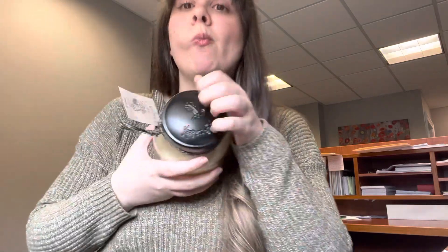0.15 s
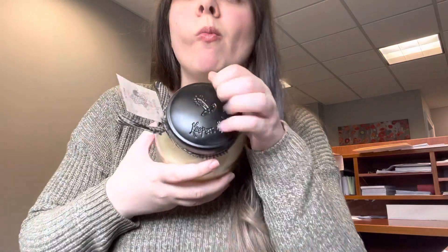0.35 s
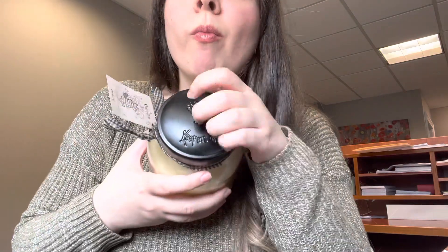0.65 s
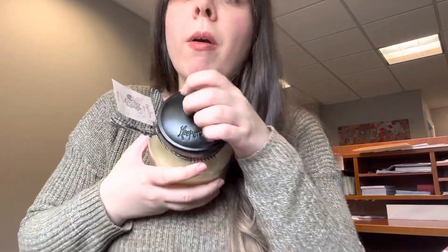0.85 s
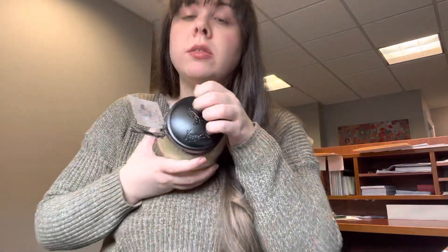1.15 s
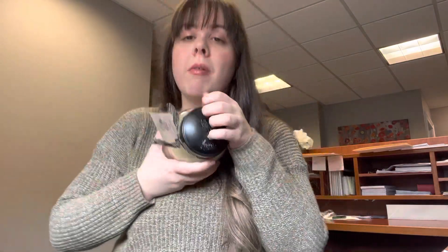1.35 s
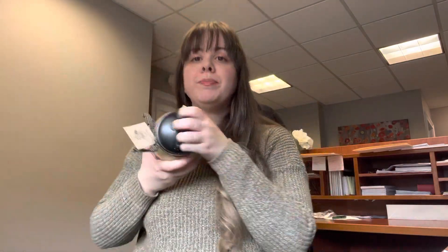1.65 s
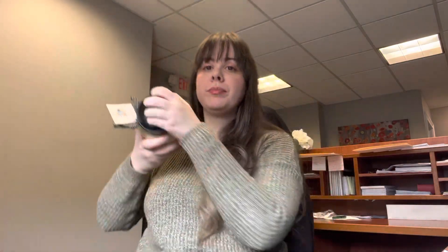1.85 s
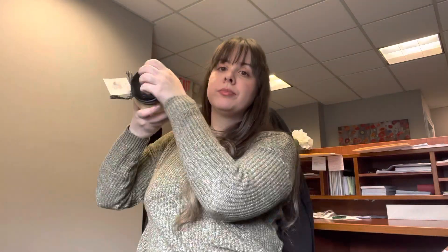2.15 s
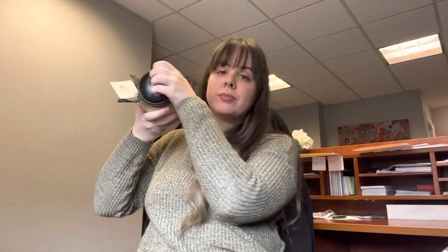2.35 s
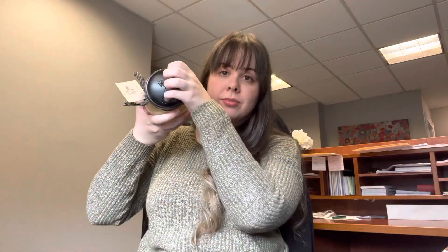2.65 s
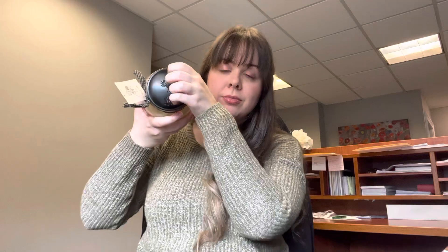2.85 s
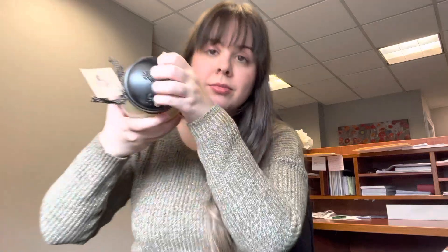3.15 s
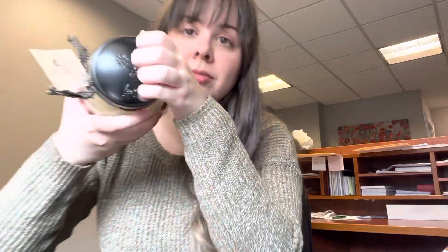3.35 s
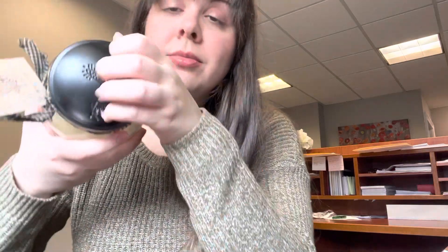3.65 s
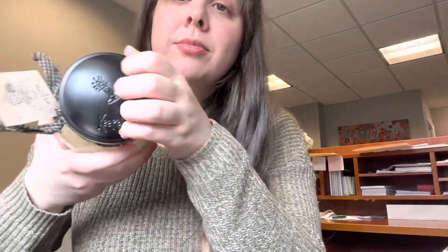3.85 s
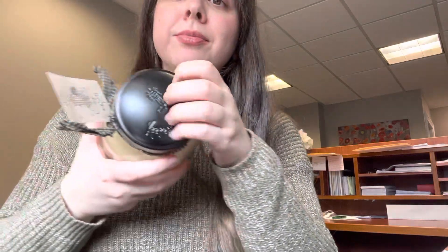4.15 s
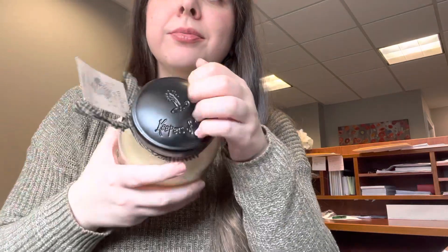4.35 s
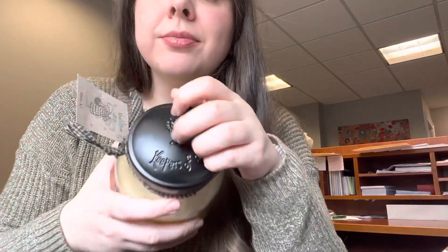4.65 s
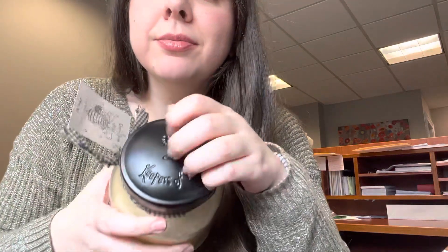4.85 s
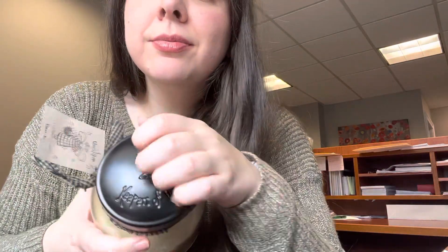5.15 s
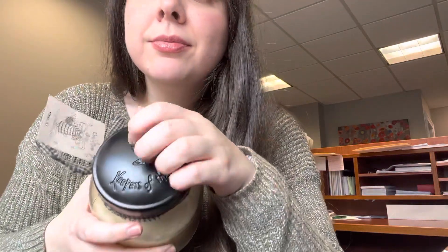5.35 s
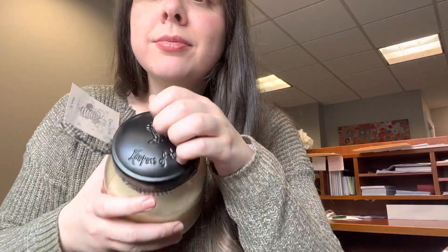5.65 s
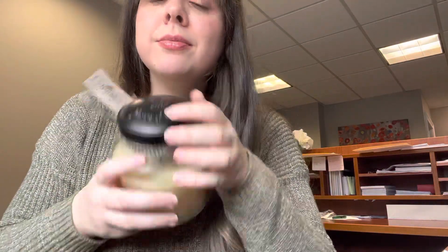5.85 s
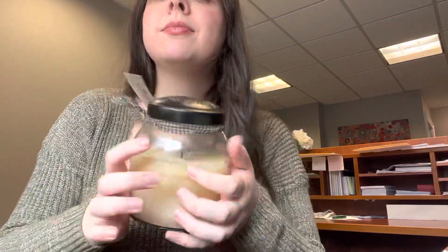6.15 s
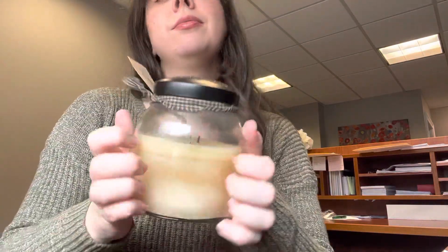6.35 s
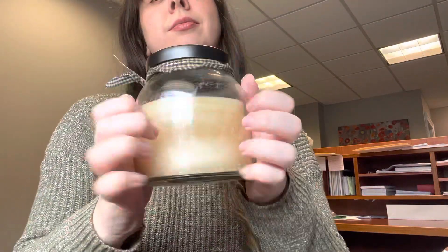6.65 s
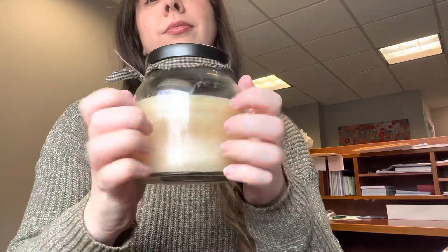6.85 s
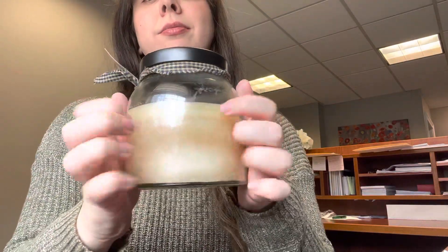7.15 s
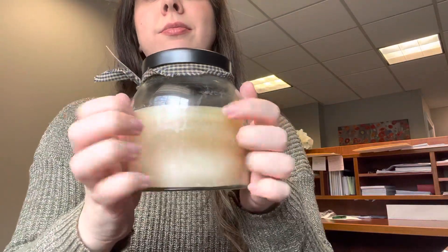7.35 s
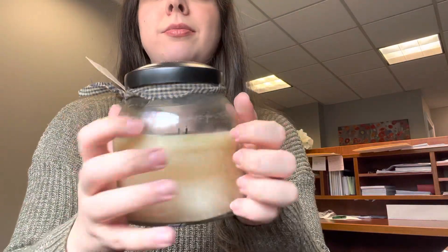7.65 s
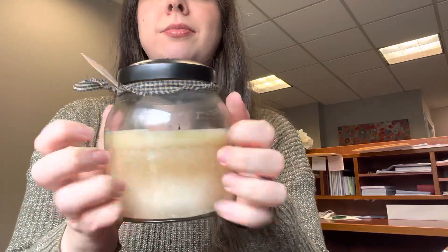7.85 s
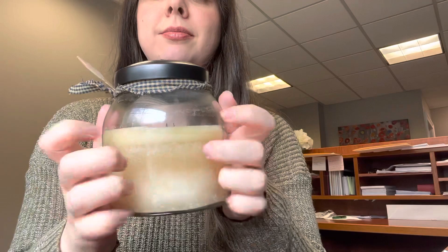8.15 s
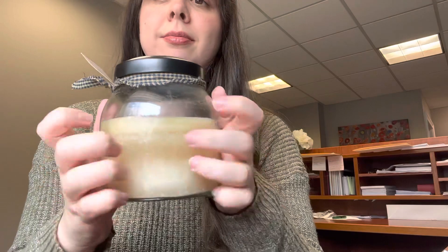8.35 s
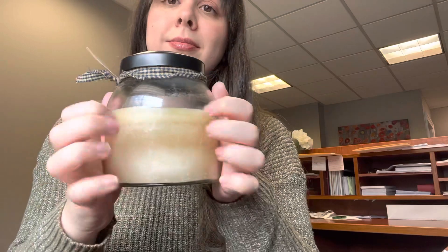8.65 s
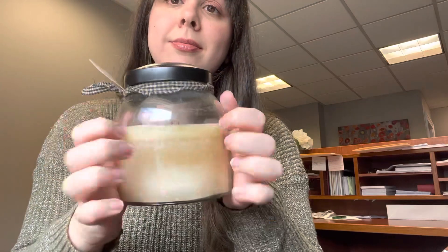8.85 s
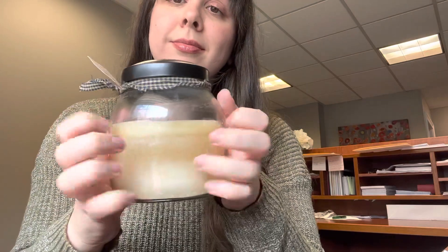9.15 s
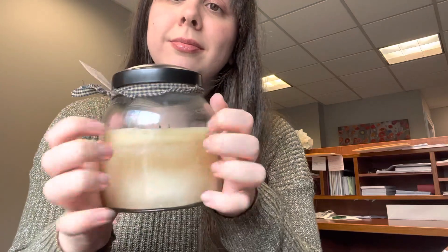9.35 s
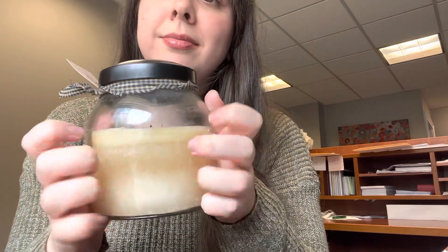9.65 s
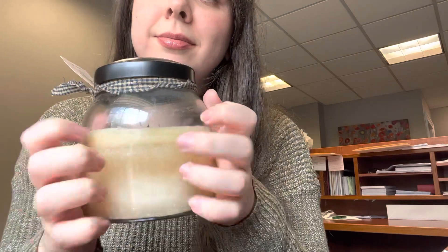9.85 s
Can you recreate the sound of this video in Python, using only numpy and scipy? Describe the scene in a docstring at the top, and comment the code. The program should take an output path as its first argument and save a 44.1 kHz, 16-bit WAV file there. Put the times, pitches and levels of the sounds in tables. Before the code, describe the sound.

Close, rapid nail tapping on a ringing metal lid with hollow knocks gives way to softer, drier clicking on a wax-filled glass jar.

```python
"""Fingernails drum on the metal lid of a wax-filled glass jar, then on its glass wall, close to two ports in an office.
Ventilation, a wandering hum and faint brushing of hands (filtered noise, a sine) lie under everything.
From the start the lid rings bright and short: noise cracks, sheet-metal modes and a hollow knock; bumps
and a squeak (gliding and wavering sines) join in. At six seconds the jar changes hands and the loose lid
rattles on the rim; then the glass gives dry ticks, noise bursts with modes damped by wax and palms."""
import sys
import numpy as np
from scipy import signal
from scipy.fft import rfft, irfft, next_fast_len
from scipy.io import wavfile
from scipy.ndimage import uniform_filter1d

SR = 44100
rng = np.random.default_rng(int(sys.argv[2]) if len(sys.argv) > 2 else 0)


def transcribe(signal):
    """Save signal, clipped to [-1, 1], as a 16-bit WAV file at the path in sys.argv[1]."""
    frames = np.atleast_2d(signal).T
    limited = np.clip(frames, -1, 1)
    pcm = np.round(limited * 32767).astype(np.int16)
    wavfile.write(sys.argv[1], SR, pcm)


N = 440118

# Ventilation colour, with a broad drone near 70 Hz. Each row: frequency in Hz, relative level in dB.
AIR_COLOUR = [(25, -22), (42, -35.5), (52, -8), (60, -7.5), (70, 2.5), (84, -6), (100, -15), (147, -6),
              (180, -13.5), (290, -8), (340, -16), (470, -18.5), (560, -27.5), (1500, -37), (3000, -54.5),
              (12500, -69.5), (13800, -93)]
# Likeness of the ventilation at the two ports. Each row: frequency in Hz, left-right correlation from 0 to 1.
AIR_LIKENESS = [(40, 0.88), (100, 1), (200, 0.58), (1000, 0.041), (10000, 0.11)]
# Swells of the ventilation. Each row: time in seconds, rumble level in dB, rush level in dB.
AIR_SWELLS = [(0.0, -36, -41), (0.19, -53.5, -49), (1.47, -38, -42.5), (2.25, -53, -48.5),
              (3.19, -51, -47.5), (3.36, -39, -38), (3.45, -45.5, -43.5), (5.09, -51, -47),
              (6.2, -41, -45.5), (7.42, -51, -45.5), (7.59, -46.5, -46.5), (9.98, -49, -46.5)]
HUM_HZ, HUM_DB, HUM_WANDER = 60.05, -48, 0.031  # mean pitch, RMS level, RMS wander as a share of the pitch

# Skin and sleeves brushing the jar. Each row: time in seconds, level in dB.
BRUSH_LEVELS = [(0.0, -69), (1.45, -58), (2.47, -67), (3.11, -56), (5.6, -98), (5.95, -64), (8.8, -78),
                (9.98, -63)]
# Colour of the brushing. Each row: frequency in Hz, relative level in dB.
BRUSH_COLOUR = [(300, -48), (800, 10.5), (2500, 1), (4000, -4), (11000, -9.5), (12500, -3), (13800, -78)]

# Nails on the lid. Each row: start in seconds, tap level in dB, then hollow knock and nail click in dB
# relative to the tap.
LID_TAPS = [(0.0014, -25, -2.5, -0.5), (0.0468, -28.5, -16, -5), (0.0928, -17.5, -8.5, -13),
            (0.1045, -31, 5.5, 4), (0.195, -32, 4.5, -6), (0.2383, -29.5, -20, -22),
            (0.2613, -23.5, -3.5, -8.5), (0.3298, -17.5, -8, -6.5), (0.4334, -29.5, -2, 1.5),
            (0.4424, -18, -20, -7), (0.4813, -25.0, -24, -14.5), (0.5025, -29.5, -2.5, -29.5),
            (0.5173, -13, -16, -15), (0.593, -17, -1, 2), (0.623, -33.5, 5, -2), (0.6489, -27, -22, -23),
            (0.663, -20.5, -11.5, -7.5), (0.6903, -41, 7, 9), (0.7038, -20, 5.5, -9),
            (0.7183, -18, -6, -7.5), (0.8369, -25, -0.5, -8), (0.9103, -13.5, -6, -7.5),
            (0.9959, -17.5, -1.5, 0.5), (1.0575, -25.5, -11, -18), (1.1073, -22, 3, -2.5),
            (1.2795, -32, -17, -18), (1.3259, -25.5, -1, -2.5), (1.3543, -33, 5, 0), (1.553, -40, 8.5, 2),
            (1.6327, -31, -8, -20), (1.6413, -24, -8, -7), (1.6898, -27, -5, -14), (1.7183, -27.5, -18, -2),
            (1.738, -15.5, -6, -11), (1.858, -36.5, 5, -10), (1.8664, -27, -33, -11),
            (1.8866, -24, -13, -4.5), (1.91, -28.5, -3, -1), (1.935, -23, -8, -1.5), (2.035, -36.5, -2, 5),
            (2.0837, -29, -7, 2), (2.1039, -25.5, -1.5, -1.5), (2.2979, -37, 2, -3), (2.3067, -32, -4, 7.5),
            (2.3531, -23, -14, -3), (2.4941, -32, 3.5, 6), (2.5215, -20.5, -9.5, 1),
            (2.5666, -23.5, -6, -1), (2.6067, -30.5, -3, -4), (2.6955, -35, 5, 10),
            (2.7397, -31.5, -11, -11), (2.7767, -31.5, -2, -18), (2.8398, -22.5, -8, -0.5),
            (2.9533, -24, -8, -14), (3.0463, -28, -2.5, -6), (3.0673, -17.5, -7, -11), (3.1574, -26, -8, 7),
            (3.2127, -31.5, -31, -19), (3.225, -28.5, -9, -3), (3.249, -36.5, -3, 6),
            (3.2788, -18.5, -1, -6), (3.2915, -21.5, -3.5, -5.5), (3.4184, -33, 1.5, 11),
            (3.4514, -23, -6, -10.5), (3.489, -23.0, -23, -6.5), (3.503, -30.5, 1, -11),
            (3.512, -14, -8.5, -9), (3.6426, -44, 13, 15.5), (3.6542, -35, 9, 10), (3.68, -20.5, -11, -15),
            (3.7232, -25, -15.5, -11), (3.739, -35, -10, -8), (3.7528, -25, -0.5, -9), (3.764, -26, -6, -1),
            (3.7738, -15.5, -4.5, -10.5), (3.8893, -48.5, 6, 14.5), (3.9133, -17.0, -11, -7.5),
            (3.9478, -27.5, 0, -13), (3.961, -43, -1, -8), (3.9919, -21.5, -2, -1), (4.0077, -23, -4, -19),
            (4.095, -50, 0, 14), (4.1132, -27, 10, 11), (4.12, -24, -27, -7), (4.1854, -22, -16, -7.5),
            (4.2056, -15.5, -24, -11.5), (4.2213, -33.5, -4.5, 0.5), (4.3825, -33.5, 0, -12),
            (4.5352, -29.5, 4, -11), (4.5918, -16, -12.5, -6), (4.6182, -31, 2, -7),
            (4.6353, -19, -13, -9.5), (4.679, -52, 4, -8.5), (4.6945, -21, -3, -25),
            (4.7037, -25, 2.5, 1.5), (4.808, -35, 1, 0), (4.839, -18, -5.5, -8), (4.8713, -29.5, 4, -17),
            (4.9075, -19.5, -4.5, -16.5), (5.0102, -34, 1.5, -26), (5.1143, -19.5, -9, 2),
            (5.1406, -29, -6, -16), (5.224, -23, 4, -5.5), (5.256, -21, -6, -17), (5.2748, -28.5, 7, 0.5),
            (5.3241, -31.5, -8.5, -8), (5.3596, -16, -12, -10.5), (5.4154, -29.5, 5, -10),
            (5.4631, -20, -1.5, -10), (5.4855, -38, 4, -27), (5.5228, -22, -8, -15),
            (5.5766, -15, -19.5, -17.5), (5.6784, -38, -14, -17)]
# Crowded groups of sheet-metal modes. Each row: frequency in Hz, relative level in dB.
SHEET_MODES = [(6300, -4), (6840, -4), (7400, -3), (7600, -4), (8340, -2), (8560, -4), (8950, -7),
               (9250, -2), (9650, -5), (9910, -3), (10250, -1), (10750, -6), (11120, -3), (11550, -5),
               (12100, -8), (12750, -6), (13500, -13), (14900, -15)]
LID_T60 = 0.15  # s, before resting fingers damp the sheet further
# The lid's lowest clear tone. Each row: frequency in Hz, relative level in dB, T60 in seconds.
LID_TONE = [(4750, 0, 0.17)]
# How strongly the struck spot wakes that tone. Each row: time in seconds, level in dB relative to the tap.
TONE_LEVELS = [(.2, -40), (.593, -28), (.704, -22), (.91, -47), (.996, -14), (1.33, -35), (1.69, -19),
               (1.738, -35), (1.887, -12.5), (1.935, -28), (2.1, -11), (2.307, -8.5), (2.353, -45),
               (2.567, -21), (2.84, -32), (3.067, -38), (3.157, -14), (3.45, -29), (3.68, -26), (3.77, -30),
               (4.0, -22.5), (4.11, -15), (4.2, -17.5), (4.535, -46), (4.7, -17.5), (4.84, -38),
               (4.91, -16), (5.11, -53), (5.256, -14), (5.46, -16), (5.523, -35), (5.577, -15)]
# Air under the lid. Each row: frequency in Hz, relative level in dB, T60 in seconds.
HOLLOW_MODES = [(217.2, -4, 0.15), (287.6, -3.5, 0.14), (411.7, -4, 0.07), (726, 2, 0.03), (940, 4, 0.026),
                (1423, -2.5, 0.024), (1848, -6.5, 0.05), (2350, -10, 0.072)]
# Colour of the nail's crack on the lid. Each row: frequency in Hz, relative level in dB.
LID_CRACK = [(1760, -8), (3000, -53), (4200, -19.5), (4800, 2.5), (5650, -4.5), (6300, 3.5), (7370, 8),
             (9940, 4), (13200, -10.5), (14000, 8.5), (15500, -23.5), (16500, -59.5)]
# Colour of the burst inside the knock. Each row: frequency in Hz, relative level in dB.
KNOCK_CRACK = [(180, -42), (300, 0), (585, -9), (921, -16.5), (1240, -11.5), (1780, -9), (3060, -19.5),
               (4500, -20), (5850, -36.5), (9900, -120)]
SNAP_DB, SHEET_DB, HOLLOW_DB = -4.5, -14, 1
SPOT_SPREAD_DB = 5.5  # how unevenly the struck spots weight the sheet modes
USUAL_TONE_DB, LOWER_PER_DB = -35.5, 0.21  # spots that wake the tone also favour the lower sheet modes
GRIP_DB_PER_S = 128  # the most extra damping that resting fingers lay on the sheet
MID_DB, MID_PER_DB = -2.5, 0.51  # the middle of the knock follows the hollow only in part

# Dull bumps sinking in pitch. Each row: start in seconds, level in dB, start pitch in Hz, end pitch in Hz,
# length in seconds.
BUMPS = [(1.1, -33.5, 215, 68, 0.045), (3.29, -30, 298, 119, 0.054), (3.33, -25.5, 100, 65.5, 0.058)]
# A short squeak. Its one row: start in seconds, level in dB, mean pitch in Hz, length in seconds.
SQUEAK = (1.279, -38, 3400, .018)

# The loose lid knocks on the rim as the jar changes hands. Each row: start in seconds, level in dB.
RATTLE_KNOCKS = [(6.02, -50), (6.05, -46), (6.097, -39), (6.103, -22.5), (6.111, -18.5), (6.117, -26.5),
                 (6.122, -21.5), (6.353, -30), (6.357, -18), (6.362, -27), (6.367, -24.5), (6.371, -22.5)]
# Colour of those knocks. Each row: frequency in Hz, relative level in dB.
RATTLE_COLOUR = [(120, -41), (200, 6.5), (322, -0.5), (500, -21), (722, -2.5), (1840, -7), (3700, -17.5),
                 (7000, -16.5), (12500, -18), (16000, -27)]

# Nails on the glass wall. Each row: start in seconds, level in dB.
GLASS_TAPS = [(6.251, -38), (6.281, -33), (6.493, -25), (6.527, -29), (6.637, -38), (6.742, -33.5),
              (6.755, -27.5), (6.84, -33), (6.856, -34.5), (6.924, -40), (6.939, -26.5), (6.986, -33.5),
              (7.053, -34), (7.076, -30.5), (7.136, -39.5), (7.165, -29), (7.197, -27), (7.257, -38),
              (7.276, -35.5), (7.292, -39), (7.355, -24.5), (7.395, -32.5), (7.424, -41), (7.441, -35),
              (7.471, -42), (7.56, -41.5), (7.637, -41), (7.714, -37.5), (7.851, -40), (7.869, -38),
              (7.89, -30.5), (7.967, -34), (8.034, -38.5), (8.06, -28), (8.078, -24), (8.084, -34),
              (8.106, -38), (8.125, -38), (8.171, -33.5), (8.181, -30.5), (8.278, -27.5), (8.319, -32),
              (8.397, -36.5), (8.476, -31.5), (8.495, -36), (8.513, -22), (8.549, -34), (8.598, -32),
              (8.615, -30.5), (8.687, -30), (8.712, -38.5), (8.881, -34), (8.91, -34), (8.931, -41),
              (8.939, -33.5), (8.954, -37), (9.026, -39), (9.05, -37.5), (9.144, -31), (9.177, -28.5),
              (9.191, -38), (9.284, -28), (9.357, -33), (9.365, -29.5), (9.374, -38), (9.395, -39),
              (9.424, -32.5), (9.446, -31), (9.493, -30.5), (9.554, -37), (9.579, -34), (9.586, -27.5),
              (9.605, -27), (9.715, -28), (9.756, -27), (9.793, -31.5), (9.802, -45), (9.812, -33.5),
              (9.82, -34.5), (9.848, -43)]
# Modes of the glass wall. Each row: frequency in Hz, relative level in dB, T60 in seconds before the palms damp it.
GLASS_MODES = [(964, -3, 0.031), (1240, 1, 0.028), (1800, -5, 0.31), (2512, -6.5, 0.056),
               (2766, -0.5, 0.026), (7130, -5, 0.1), (9470, -5.5, 0.097)]
# Colour of the nail's crack on the glass. Each row: frequency in Hz, relative level in dB.
GLASS_CRACK = [(350, -14.5), (600, -9), (1580, -10.5), (2500, -7), (3440, -29.5), (4670, -9.5),
               (6080, -18.5), (7800, -13.5), (12300, -19), (14000, -12), (16500, -36)]
# harder taps gain less treble than body
USUAL_GLASS_DB, TREBLE_DB, TREBLE_PER_DB, TREBLE_SPREAD_DB = -31, -4.5, -0.25, 2

# Office reverberation. Each row: frequency in Hz, T60 in seconds.
OFFICE_T60 = [(200, 0.17), (1000, 0.18), (4000, 0.2), (12500, 0.18)]
# Balance of near sounds. Each row: frequency in Hz, left minus right in dB.
PORT_BALANCE = [(130, 0), (290, -4), (640, -4.5), (1410, 0.5), (3100, 1.5), (6820, -3.5), (12000, 0)]
# Phase between the ports for the lid. Each row: frequency in Hz, lead of the left port in radians.
LID_PHASE = [(0, 0), (340, -0.4), (780, 1.0), (1030, 0.2), (1890, 0.6), (2410, -0.6), (3880, -0.6),
             (5510, -2.3), (7320, -1.6), (9390, -0.1), (10900, 0.2), (13400, 2.9), (16300, 2.5)]
# Phase between the ports for the glass. Each row: frequency in Hz, lead of the left port in radians.
GLASS_PHASE = [(0, 0), (1810, 0.9), (3100, -1.8), (5170, -2), (11300, 0.6), (13400, 2.5)]
# The jar sways across the microphone. Each row: time in seconds, added delay of the knock at the left port in ms.
SWAY = [(0, 0.017), (.7, 0.069), (1.6, -0.11), (2.5, -0.1), (3.6, -0.043), (4.4, 0.003), (5.1, 0.00074),
        (5.7, -0.017)]
EDGE_HZ = 16500


def amp(db):
    """Turns decibels into a gain."""
    return 10 ** (np.asarray(db) / 20)


def evened(x):
    """Scales a signal to an RMS of one."""
    return x / np.sqrt(np.mean(x ** 2) + 1e-20)


def read(points, hz):
    """Reads a curve along a logarithmic frequency axis."""
    f, value = np.transpose(points)
    return np.interp(np.log(hz + 1), np.log(f + 1), value)


def add(mix, s, sound):
    """Lays a sound into the mix at s seconds."""
    part = mix[max(round(s * SR), 0):][:len(sound)]
    part += sound[:len(part)]


def parted(x, hz):
    """The part below hz and the part above it."""
    low = signal.sosfilt(signal.butter(2, hz, fs=SR, output="sos"), x)
    return low, x - low


def crack(colour, count, t60, rise, solid=0):
    """Short bursts of coloured noise, one row a blow, all of equal energy; solid adds one firm click at the front."""
    t = np.arange(2048) / SR
    push = rng.standard_normal((count, 2048))
    push[:, 10] += solid
    noise = irfft(rfft(push) * amp(read(colour, np.fft.rfftfreq(2048, 1 / SR))))
    shape = amp(-60 * t / t60) * (1 - np.exp(-t / rise))
    burst = noise * shape
    return burst * np.linalg.norm(shape) / np.linalg.norm(burst, axis=1, keepdims=True)


def ring(modes, count, spread_db, seconds=0.34, split=0.0046, size=3):
    """Every blow lands on another spot and weights the modes anew; uneven walls split each mode into a group."""
    hz, db, t60 = np.repeat(np.transpose(modes), size, axis=1)[:, :, None]
    t = np.arange(int(seconds * SR)) / SR
    hz = hz * (1 + split * rng.standard_normal(hz.shape))
    shapes = amp(db - 60 * t / t60) * np.sin(2 * np.pi * hz * t)
    spot = amp(spread_db * np.repeat(rng.standard_normal((count, len(modes))), size, axis=1))
    blows = (spot * rng.standard_normal(spot.shape)) @ shapes / np.linalg.norm(amp(db))
    energy = np.linalg.norm(blows, axis=1, keepdims=True)
    return blows * np.median(energy) / energy  # every blow hands over the same energy


def ventilation():
    """Patchy noise: a rumble below the split and a rush above it, each swelling on its own."""
    frames, hz = N // 1024 + 5, np.fft.rfftfreq(4096, 1 / SR)
    a, b, c, d, patches = rng.standard_normal((frames, 2049, 5)).T
    patches = uniform_filter1d(patches, 20, axis=0)  # smooth across frequency
    patches = evened(uniform_filter1d(patches, 4, axis=1))  # smooth across time
    same = np.clip(read(AIR_LIKENESS, hz), -1, 1)[:, None]
    left = a + 1j * b
    right = same * left + np.sqrt(1 - same ** 2) * (c + 1j * d)
    spectra = np.array([left, right]) * amp(read(AIR_COLOUR, hz)[:, None] + 2.0 * patches)
    low = 1 / (1 + (hz[:, None] / 105) ** 12)  # split at 105 Hz
    rumble, rush = (evened(signal.istft(spectra * gain, nperseg=4096, noverlap=3072)[1][:, :N])
                    for gain in (low, 1 - low))
    s, rumble_db, rush_db = np.transpose(AIR_SWELLS)
    t = np.arange(N) / SR
    return amp(np.interp(t, s, rumble_db)) * rumble + amp(np.interp(t, s, rush_db)) * rush


def hum():
    """A low tone in the ventilation whose pitch wanders slowly."""
    wander = uniform_filter1d(rng.standard_normal(N), size=6000)
    wander = evened(uniform_filter1d(wander, size=6000))
    turns = np.cumsum(HUM_HZ * (1 + HUM_WANDER * wander)) / SR
    return amp(HUM_DB) * np.sqrt(2) * np.sin(2 * np.pi * turns)


def hands():
    """Skin and sleeves brush the jar: faint coloured noise with an uneven level."""
    colour = amp(read(BRUSH_COLOUR, np.fft.rfftfreq(N, 1 / SR)))
    noise = irfft(rfft(rng.standard_normal(N)) * colour, N)
    uneven = evened(uniform_filter1d(rng.standard_normal(N), 600))
    level_db = np.interp(np.arange(N) / SR, *np.transpose(BRUSH_LEVELS))
    return evened(noise) * amp(level_db + 3.5 * uneven)


def sheet_modes():
    """The lid's mode groups with their common decay."""
    return [(hz, db, LID_T60) for hz, db in SHEET_MODES]


def lid():
    """A crack of the nail, the ringing sheet metal, the knock of the hollow beneath, and a small rebound."""
    out, knock, count = np.zeros(N), np.zeros(N), len(LID_TAPS)
    snap = crack(LID_CRACK, count, 0.019, 0.00048)
    snap += amp(-5.0) * crack(LID_CRACK, count, 0.029, 0.0014)
    snap_low, snap_high = parted(snap, 7800)
    sheet = ring(sheet_modes(), count, SPOT_SPREAD_DB, size=26, split=0.0072)
    sheet_low, sheet_high = parted(sheet, 7800)
    tone = ring(LID_TONE, count, 0, split=0.00593, size=9)

    # the knock, burst and air modes alike, falls into deep, middle and click
    burst = crack(KNOCK_CRACK, count, 0.01, 0.00041, solid=6.7)
    burst += amp(-10.0) * crack(KNOCK_CRACK, count, 0.055, 0.0019)
    dull, burst_click = parted(burst, 1700)
    burst_deep, burst_mid = parted(dull, 550)
    air = amp(HOLLOW_DB) * ring(HOLLOW_MODES, count, 3.7, split=0.0605, size=12)
    hollow, air_click = parted(air, 1760)
    air_deep, air_mid = parted(hollow, 550)

    lag, rebound, grip = rng.random((count, 3)).T
    t = np.arange(tone.shape[1]) / SR
    for k, (s, db, knock_db, click_db) in enumerate(LID_TAPS):
        deep, mid, click = amp(db + np.array([knock_db, MID_DB + MID_PER_DB * knock_db, click_db]))
        thud = deep * burst_deep[k] + mid * burst_mid[k] + click * burst_click[k]
        tone_db = np.interp(s, *np.transpose(TONE_LEVELS))
        lower = amp(LOWER_PER_DB * (tone_db - USUAL_TONE_DB))
        tick = amp(db + SNAP_DB) * (lower * snap_low[k] + snap_high[k])
        again = s + 0.003 + 0.014 * lag[k]  # s, moment of the rebound
        weaker = amp(-10.5 - 7.4 * rebound[k])
        for mix, sound in (out, tick), (knock, thud):
            add(mix, s, sound)
            add(mix, again, weaker * sound)
        damped = amp(db + SHEET_DB - GRIP_DB_PER_S * grip[k] * t)
        add(out, s, damped * (lower * sheet_low[k] + sheet_high[k]))
        add(out, s, amp(db + tone_db) * tone[k])
        add(knock, s, deep * air_deep[k] + mid * air_mid[k] + click * air_click[k])
    return out, knock


def bump():
    """Soft low swings whose pitch sinks as they swell and die."""
    out = np.zeros(N)
    for s, db, start_hz, end_hz, length in BUMPS:
        u = np.arange(0, 1, 1 / (length * SR))
        turns = np.cumsum(start_hz * (end_hz / start_hz) ** u) / SR
        add(out, s, amp(db) * np.sin(np.pi * u) * np.sin(2 * np.pi * turns))
    return out


def squeak():
    """A wavering tone that starts quickly."""
    s, db, hz, length = SQUEAK
    out, size = np.zeros(N), int(length * SR)
    waver = evened(uniform_filter1d(rng.standard_normal(size), 80))
    turns = np.cumsum(hz * (1 + 0.053 * waver)) / SR
    swell = np.sin(np.pi * np.linspace(0, 1, size) ** 0.5)
    add(out, s, amp(db) * swell * np.sin(2 * np.pi * turns))
    return out


def rattles():
    """The loose lid knocks on the rim; each knock also rings the glass and the lid."""
    out, count = np.zeros(N), len(RATTLE_KNOCKS)
    knocks = crack(RATTLE_COLOUR, count, 0.028, 0.00069)
    wall = ring(GLASS_MODES, count, 0.91, split=0.04, size=20)
    sheet = ring(sheet_modes() + LID_TONE, count, 1.8, size=8)
    for k, (s, db) in enumerate(RATTLE_KNOCKS):
        add(out, s, amp(db) * knocks[k])
        add(out, s, amp(db) * (amp(-12.0) * wall[k] + amp(-22.5) * sheet[k]))
    return out


def glass():
    """Dry ticks: both palms damp the wall's modes, now and then loosely; light touches are thinner and brighter."""
    out, count = np.zeros(N), len(GLASS_TAPS)
    palm_t60 = 0.03 + 0.3 * rng.random((count, 1)) ** 4  # s, mostly short
    palms = amp(-60 * np.arange(2048) / SR / palm_t60)
    snap = crack(GLASS_CRACK, count, 0.01, 0.000089, solid=9)
    snap += amp(-6.5) * palms * ring(GLASS_MODES, count, 1.4, 2048 / SR, split=0.0197, size=10)
    low, high = parted(snap, 4160)
    chance = rng.standard_normal(count)
    for k, (s, db) in enumerate(GLASS_TAPS):
        treble_db = TREBLE_DB + TREBLE_PER_DB * (db - USUAL_GLASS_DB) + TREBLE_SPREAD_DB * chance[k]
        add(out, s, amp(db) * (low[k] + amp(treble_db) * high[k]))
    return out


def office(x):
    """Sparse reflections of random sign, each band dying at its own speed."""
    taps = np.zeros((2, SR // 2))
    at = np.arange(160, SR // 2 - 20, 20)
    at = at + rng.integers(0, 20, (2, len(at)))
    np.put_along_axis(taps, at, rng.choice([-1., 1.], at.shape), 1)
    hz, t, z = signal.stft(taps, SR, nperseg=128)
    decay = amp(-60 * t / read(OFFICE_T60, hz)[:, None])
    tail = signal.istft(z * decay, SR, nperseg=128)[1]
    return signal.fftconvolve(x[None], tail / np.linalg.norm(tail[0]), axes=1)[:, :N]


def ports(x, phase):
    """The two ports hear a near source with a phase and level difference that depends on pitch."""
    size = next_fast_len(N)
    hz = np.fft.rfftfreq(size, 1 / SR)
    half = np.exp(0.5j * read(phase, hz)) * amp(0.5 * read(PORT_BALANCE, hz))
    return irfft(rfft(x, size) * np.array([half, 1 / half]), size)[:, :N]


def swayed(x):
    """Shifts the two channels against each other as the jar moves."""
    t = np.arange(N) / SR
    lag = np.interp(t, *np.transpose(SWAY)) / 2000  # ms to s, half for each port
    return np.array([np.interp(t - lag, t, x[0]), np.interp(t + lag, t, x[1])])


def scene():
    """Sends the near sounds to the ports and the office, then lays the bumps and the air underneath."""
    metal, knock = lid()
    wall = glass() + hands()
    top = metal + rattles() + squeak()
    room = office(amp(-9.0) * top + amp(-7) * knock + amp(-12.5) * wall)
    wide, narrow = parted(room, 5500)  # the ports hear the room's treble nearly alike
    near = ports(top + narrow[0], LID_PHASE) + swayed(ports(knock, LID_PHASE)) + ports(wall, GLASS_PHASE)
    treble_width = 0.19 * (narrow - narrow[::-1])
    return near + wide + treble_width + bump() + hum() + ventilation()


def record(dry):
    """A steep low-pass closes the top of the band."""
    low_pass = signal.firwin(511, EDGE_HZ, window=("kaiser", 9), fs=SR)
    return signal.oaconvolve(dry, low_pass[None], "same")


dry = scene()
out = record(dry)
transcribe(out)
```